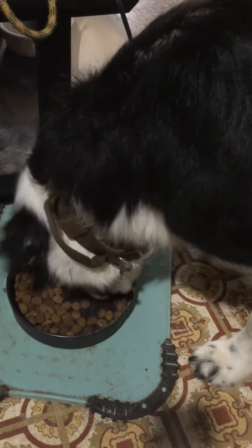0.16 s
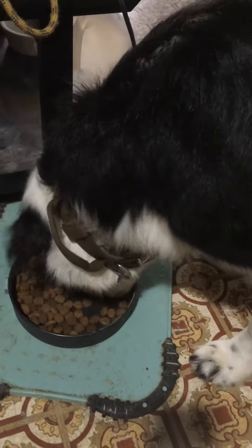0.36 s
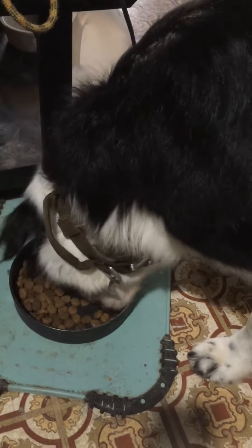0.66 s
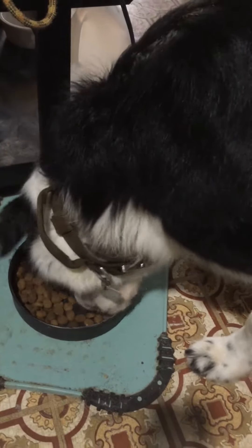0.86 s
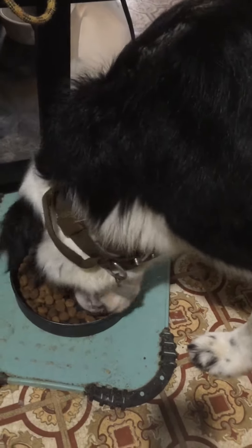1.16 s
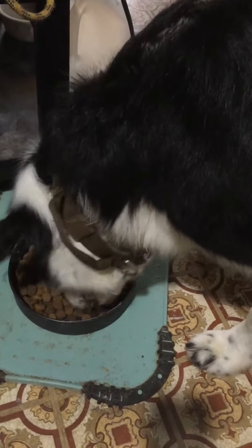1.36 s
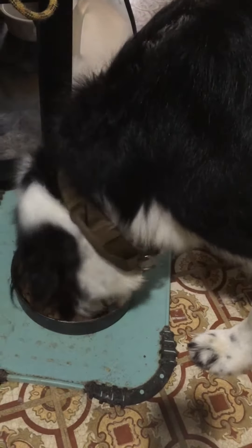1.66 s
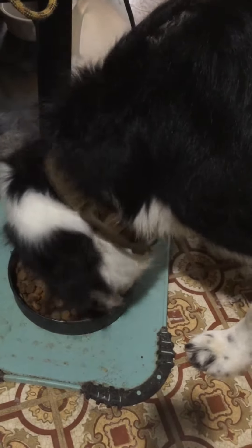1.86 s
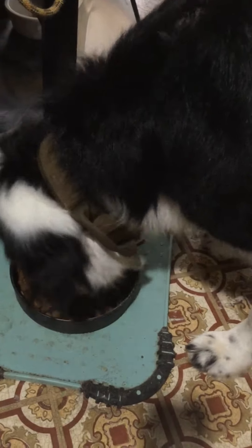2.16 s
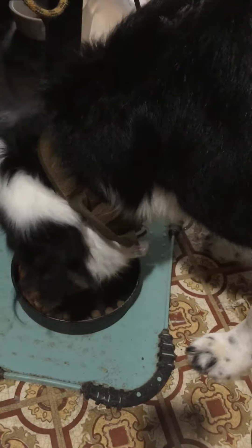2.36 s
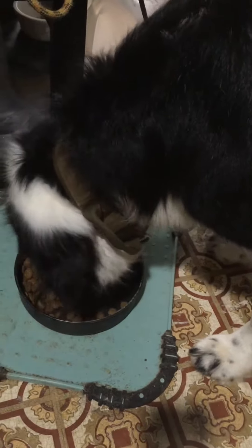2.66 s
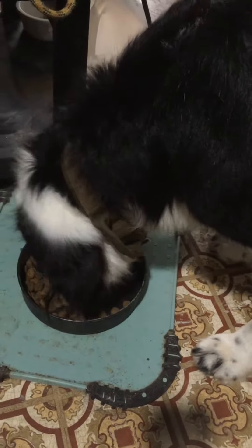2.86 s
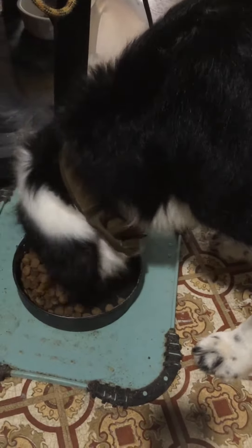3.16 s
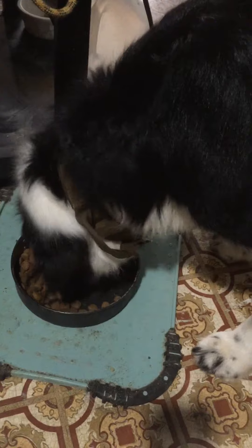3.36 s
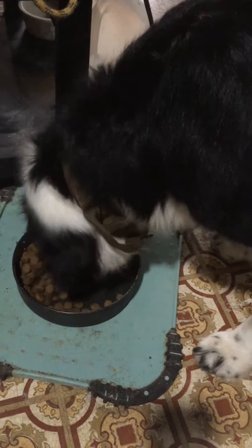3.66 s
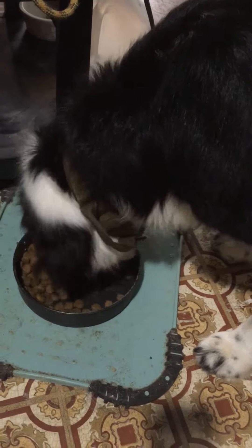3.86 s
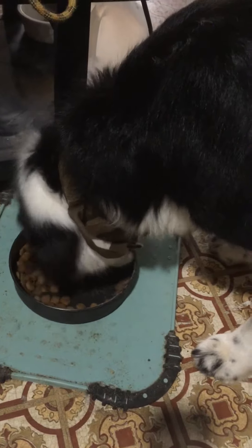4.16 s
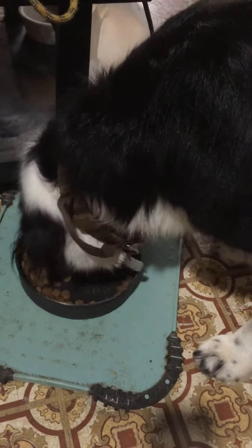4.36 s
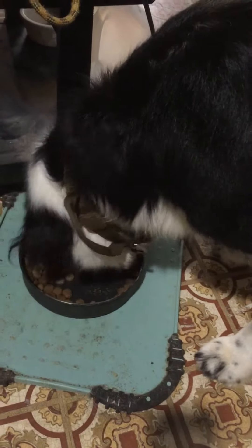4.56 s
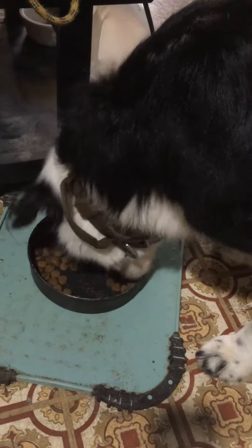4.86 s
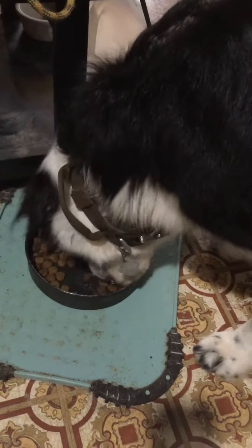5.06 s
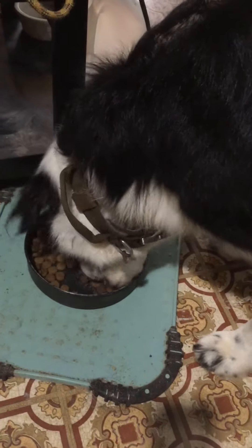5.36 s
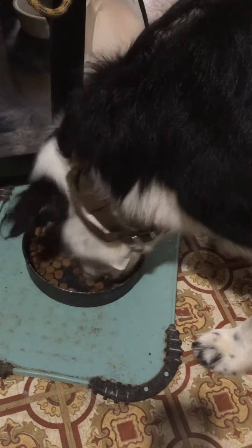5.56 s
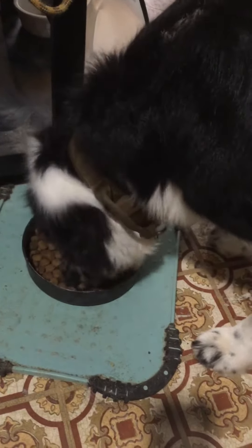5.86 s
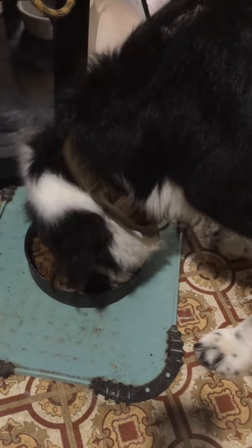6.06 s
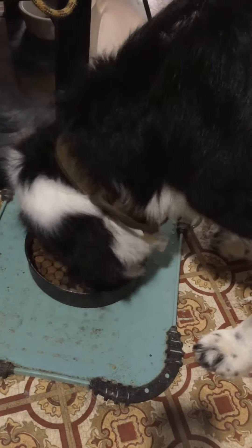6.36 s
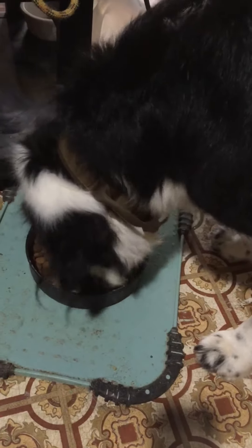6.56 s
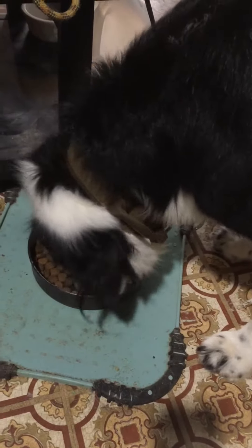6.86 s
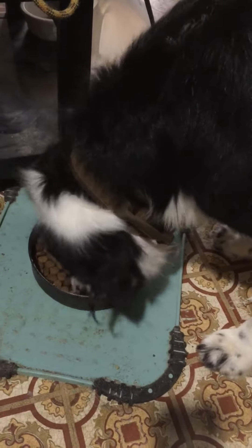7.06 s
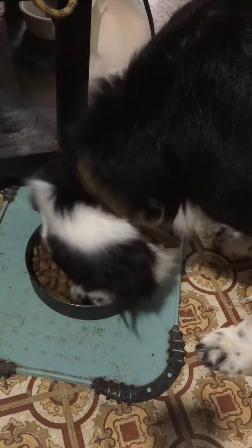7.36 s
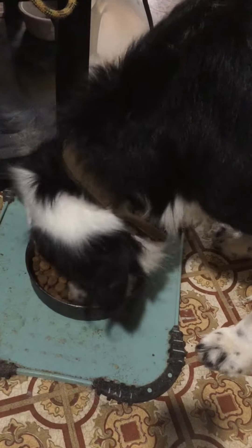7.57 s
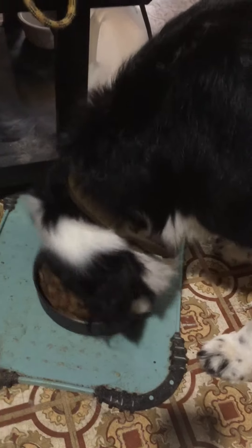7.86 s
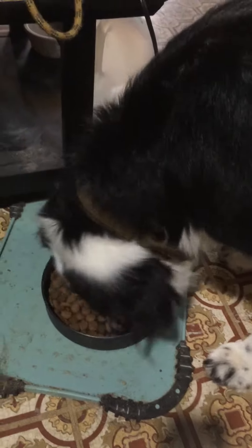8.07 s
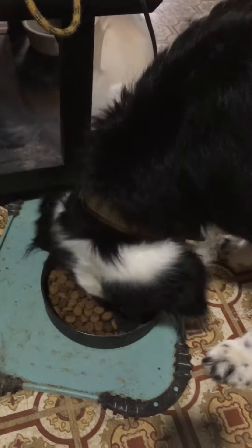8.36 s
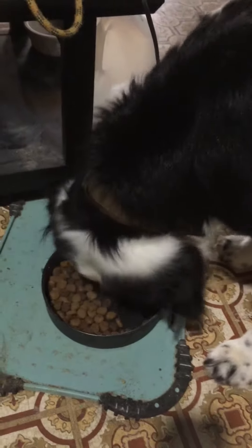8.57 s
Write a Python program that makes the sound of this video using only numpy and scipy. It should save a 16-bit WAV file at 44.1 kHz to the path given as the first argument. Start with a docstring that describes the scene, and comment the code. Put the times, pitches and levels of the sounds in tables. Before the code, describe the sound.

A dog crunches dry kibble from a bowl in a small tiled room, pellets rattling, with wet lip smacks and brief chewing pauses.

```python
"""A dog eats dry kibble from a bowl on a mat in a tiled room, over quiet air and a wavering hum (noise, sine).
Lips work, the muzzle nudges bowl and mat, and wet smacks start: clicks and bursts through mouth resonances.
Then pellets crack between the teeth as avalanches of tiny breaks, while the rest rattle, slide and scrape
as clumped clicks. Jaws clop softly; later a collar tag tinkles in decaying sines, crusts tick on the teeth,
the muzzle rubs the bowl with a hollow tone, and mouthfuls go down in smack-clop-smack gulps."""
import sys
import numpy as np
from scipy import signal
from scipy.fft import rfft, irfft
from scipy.io import wavfile
from scipy.ndimage import uniform_filter1d

SR = 44100
rng = np.random.default_rng(int(sys.argv[2]) if len(sys.argv) > 2 else 0)


def to_wav(sig):
    """Store sig (one row per channel, or 1-D mono) as 16-bit WAV at the path in sys.argv[1].

    Samples outside -1..1 are clipped; the rate is SR.
    """
    pcm = np.clip(np.atleast_2d(sig), -1, 1) * 32767
    pcm = np.round(pcm).astype(np.int16)
    wavfile.write(sys.argv[1], SR, pcm.T)  # frames by channels


N = 384552
GRAIN = 8192         # samples in one burst and in a colouring filter
CUTOFF_HZ = 16100    # top of the sound

# quiet indoor air, its tone: f/Hz, relative level/dB
AIR_SPECTRUM = [(25, -12.5), (45, -1.5), (65, -1), (110, -0.5), (300, -19), (1000, -20), (3000, -20.5),
                (8000, -27), (16000, -32)]
AIR_DB, HUM_HZ = -66.5, 59.7
# hum level curve: t/s, level/dB
HUM_LEVEL = [(0, -67), (7.5, -66.5), (8.1, -71.5)]
# lips and tongue working, level curve before make-up gain: t/s, level/dB
LIPS_LEVEL = [(0.0, -63.5), (0.27, -71), (2.96, -73), (3.54, -69.5), (8.43, -73.5), (8.72, -76.5)]
# tone of the working lips: f/Hz, relative level/dB
MOUTH_SPECTRUM = [(50, -15.5), (110, 7), (220, -1), (400, -6.5), (750, -8), (1200, -9), (3000, -20)]

# the muzzle digs into the food: peak t/s, rattle level/dB before the mix trim, swell time/s
DIGS = [(0.248, -41, 0.011), (0.424, -48.5, 0.022), (0.717, -38, 0.0074), (1.044, -42.5, 0.022),
        (1.405, -40, 0.072), (1.615, -37, 0.0027), (1.727, -36.5, 0.046), (3.028, -35.5, 0.0091),
        (3.13, -37.5, 0.11), (3.235, -50, 0.015), (3.406, -28.5, .02), (3.53, -38, 0.022),
        (3.69, -36.5, 0.029), (3.79, -41, 0.027), (3.97, -44.5, 0.009), (4.035, -39, 0.041),
        (4.19, -43, 0.21), (4.31, -33.5, 0.015), (4.357, -38, 0.0041), (4.479, -43.5, 0.034),
        (4.681, -34.5, 0.044), (4.81, -39, 0.012), (4.979, -36, 0.028), (5.051, -38, 0.021),
        (5.165, -40.5, 0.015), (5.315, -31.5, 0.033), (5.39, -37.5, 0.0087), (5.591, -41.5, 0.025),
        (5.669, -42, 0.053), (5.973, -37.5, 0.032), (6.297, -44.5, 0.015), (7.23, -42.5, 0.029),
        (7.358, -39, 0.033), (7.475, -33.5, 0.014), (8.412, -53.5, 0.097)]
# pellets nosed along the bowl: middle t/s, half length/s, hiss level/dB before the mix trim
SCRAPES = [(0.563, 0.011, -51), (0.612, 0.016, -45.5), (0.911, 0.0065, -36), (1.255, 0.0073, -38),
           (3.035, 0.0038, -31), (3.622, 0.017, -39), (4.352, 0.0084, -33), (4.691, 0.0094, -34),
           (4.82, 0.071, -44.5), (4.9, 0.022, -42), (5.861, 0.0093, -42.5), (7.937, 0.045, -49.5),
           (8.035, 0.022, -43.5), (8.408, 0.0079, -39)]
SETTLE_SHARE = 1.09          # pellets settle in this many swell times
HISS_UNDER_RATTLE_DB = -15   # hiss that a dig brings along
SCRAPE_RATTLE_DB = -2        # rattle that a scrape brings along, relative to its hiss
# tone of loose pellets, also of the wet click in a soft contact: f/Hz, relative level/dB
RATTLE_SPECTRUM = [(300, -40.5), (450, -5.5), (650, -6.5), (1100, -4.5), (2000, 0.5), (3500, -11.5),
                   (5000, -18), (8000, -19.5), (16000, -31.5)]
# tone of sliding crusts: f/Hz, relative level/dB
HISS_SPECTRUM = [(800, -12.5), (2000, 5), (4000, -2), (7000, -4.5), (10500, -10.5), (12500, -7),
                 (16000, -16.5)]

# crumbs break at random, each one stronger the harder the food is stirred
CRUMBS_PER_S, CRUMB_HZ, CRUMB_S = 18, 1790, 0.00036   # pitch is the middle of a spread
CRUMB_OVER_RATTLE_DB, CRUMB_IDLE_DB = -1.5, -57.5

# dull nudges against bowl and mat, before the contact trim: t/s, level/dB, f/Hz, swell time/s
NUDGES = [(0.091, -61, 226, 0.1), (0.568, -53.5, 93, 0.013), (1.258, -41, 66, 0.016),
          (5.649, -41, 203, 0.0081), (6.381, -52.5, 190, 0.027), (7.215, -39.5, 173, 0.006)]
NUDGE_WET_DB = -22
# small wet smacks of tongue and lips: t/s, level/dB, f/Hz, peeling time/s
SMACKS = [(0.103, -49, 2400, 0.00089), (0.12, -47, 650, 0.00099), (0.134, -45.5, 3850, 0.00093),
          (0.162, -53, 1050, .002), (2.131, -40, 654, 0.00081), (2.6, -38, 1470, 0.0012),
          (2.683, -38, 860, .002), (6.515, -44, 1500, .0014), (6.542, -47.5, 1110, 0.002),
          (6.708, -40, 2250, .0012), (6.744, -52, 4600, 0.0048), (6.794, -41, 2000, 0.0023),
          (6.807, -45, 3340, 0.0012), (6.85, -35, 2020, .0024), (6.894, -39, 1340, 0.011),
          (7.11, -41.5, 1530, 0.00089), (7.192, -39, 1940, 0.001), (7.319, -44, 1880, 0.0024),
          (7.36, -34.5, 1540, 0.0048), (7.44, -34, 1600, 0.0017), (7.711, -41.5, 1363, 0.0019),
          (7.778, -47.5, 1140, .005), (8.169, -42, 1400, 0.0096), (8.231, -42.5, 1540, .0015),
          (8.285, -42.5, 1800, 0.0031), (8.498, -42.5, 830, .0013), (8.632, -47, 1670, 0.0038)]

# loud breaks of a pellet: t/s, level/dB, f/Hz, nominal crumbling time/s, bright snap level/dB re the break
CRACKS = [(0.212, -42.5, 1880, 0.0011, -30), (0.25, -35.5, 1140, 0.0019, -25),
          (0.305, -25.0, 3060, 0.00096, -8.5), (0.396, -37.5, 1840, 0.00063, -25),
          (0.452, -46.5, 1260, 0.0028, -25), (0.74, -27, 1080, 0.0013, -18),
          (0.775, -8.0, 2100, 0.00072, -15.5), (0.831, -32, 1540, 0.0007, -30),
          (1.03, -33.5, 990, 0.002, -30), (1.069, -24.5, 1440, 0.00056, -38),
          (1.413, -24.5, 1550, 0.0013, -34), (1.432, -16.5, 1230, 0.0011, -18.5),
          (1.456, -35, 1220, 0.0015, -29), (1.545, -35, 1450, 0.0012, -29), (1.667, -34, 1470, 0.001, -39),
          (1.707, -25.5, 1980, 0.0022, -13), (1.737, -22, 1540, 0.00092, -25),
          (1.771, -26, 1440, 0.00065, -35), (1.822, -25, 1660, 0.00072, -26),
          (1.914, -16, 1480, 0.0006, -38), (1.932, -27.5, 1230, 0.00082, -32),
          (2.908, -24.5, 1464, 0.0013, -32), (2.916, -24.5, 1680, 0.00071, -17),
          (2.994, -32.5, 1680, 0.00084, -23), (3.003, -30.0, 1520, 0.00071, -21),
          (3.02, -23, 2000, 0.0025, -21.5), (3.054, -27, 1560, 0.00072, -16),
          (3.143, -30.5, 1840, 0.0081, -16), (3.191, -15.5, 2110, 0.0037, -8.5),
          (3.211, -20, 1860, 0.00097, -16), (3.317, -30.5, 1280, 0.0011, -23),
          (3.37, -24, 1840, 0.00083, -12), (3.394, -9, 2340, 0.00093, -17.5),
          (3.429, -20.5, 2000, 0.0011, -20), (3.506, -15.5, 1900, 0.0012, -23),
          (3.678, -24.5, 1840, 0.0055, -24.5), (3.691, -22.5, 1970, 0.0012, -9),
          (3.7, -20, 1950, 0.0012, -18), (3.733, -24, 1590, 0.0011, -27),
          (3.935, -31.5, 1520, 0.0018, -14.5), (4.008, -9.5, 2090, 0.0015, -17),
          (4.03, -24, 2000, 0.0033, -13.5), (4.139, -22.5, 1700, 0.0013, -12),
          (4.151, -21.5, 2580, 0.0016, -14), (4.224, -25.5, 1950, 0.001, -31),
          (4.365, -21, 2100, 0.0029, -13), (4.468, -16.5, 2470, 0.0026, -12),
          (4.702, -18.5, 1920, 0.0021, -32), (4.738, -19.5, 2900, 0.00034, -7),
          (4.768, -26.5, 2720, 0.001, -27), (4.787, -19, 2700, 0.0039, -8),
          (4.942, -29.5, 2170, 0.0021, -10), (4.977, -26, 2030, 0.0022, -26),
          (5.179, -20, 1650, 0.00076, -33), (5.301, -20, 1940, 0.0054, -16.5),
          (5.324, -17, 1230, 0.00062, -21), (5.348, -21.5, 1000, 0.0011, -20),
          (5.364, -20, 1480, 0.0014, -25), (5.444, -26.5, 1480, 0.0017, -29),
          (5.456, -19, 1810, 0.0045, -10.5), (5.463, -11.5, 1860, 0.0014, -12.5),
          (5.646, -13, 1550, 0.00098, -20), (5.953, -31, 1450, 0.0016, -27),
          (5.986, -12.5, 1660, 0.001, -18), (6.012, -15.5, 2140, 0.0013, -16),
          (6.055, -18, 1840, 0.0008, -20.5), (6.103, -24.5, 1480, 0.00076, -39),
          (6.301, -13.5, 1820, 0.0012, -16.5), (6.333, -15.0, 2280, 0.0015, -16),
          (7.202, -24.5, 1650, 0.00065, -26), (7.402, -27.5, 1630, 0.0006, -22),
          (7.473, -29, 1560, 0.0025, -13), (7.521, -28.5, 1120, 0.0012, -22),
          (7.635, -30.5, 1830, 0.00044, -26), (7.74, -37.5, 1370, 0.0018, -34),
          (7.851, -39, 1450, 0.0012, -25), (7.97, -25, 1550, 0.0012, -20), (8.018, -18, 2360, 0.00057, -18),
          (8.131, -31.5, 1500, 0.00036, -22), (8.206, -34.5, 1400, 0.0015, -12.5),
          (8.396, -30, 2020, 0.0059, -14), (8.436, -27, 1980, 0.0011, -9), (8.56, -32, 1440, 0.00046, -27)]
# resonances of muzzle and bowl, before each break's variation: f/Hz, width/Hz, level/dB
CAVITY = [(673, 190, 6.5), (1010, 250, -0.5), (1350, 150, 7), (2130, 330, -3), (3130, 96, -11.5),
          (3600, 760, -4), (4190, 130, -7)]
# tone of the bright snap: f/Hz, relative level/dB
SNAP_SPECTRUM = [(2500, -38), (5500, 4), (8000, -1), (10500, -8.5), (13000, -7), (16000, -19)]

# jaws clop shut while chewing, before the contact trim: t/s, level/dB, f/Hz
CLOPS = [(0.741, -32, 756), (1.031, -32, 730), (2.618, -31, 507), (3.691, -24, 690), (4.01, -22, 900),
         (4.67, -27.5, 467), (6.708, -43, 560), (8.231, -36.5, 640)]
CLOP_S, CLOP_WET_DB = 0.0023, -9.5

# the tag touches the collar ring: t/s, level/dB, factor on the ringing time (fur damps it)
TAG_TOUCHES = [(1.536, -35, 0.11), (2.072, -46, 1.15), (2.086, -28, 0.31), (2.103, -33, 0.56),
               (5.74, -45, 0.13), (6.119, -51, 0.18), (7.762, -46, 0.12)]
# modes of the tag: f/Hz, mean level/dB, t60/s before that factor
TAG_MODES = [(7770, -10, .4), (10705, -5, .2), (14802, -3, .26)]

# a hard crust clicks against a tooth: t/s, level/dB
TOOTH_TICKS = [(2.014, -46), (2.03, -38), (3.449, -31.5), (4.284, -31)]
# the muzzle rubs along the bowl: t/s, level/dB, f/Hz, swell time/s
RUBS = [(2.029, -52, 755, 0.045), (2.181, -46.5, 860, 0.03), (2.475, -52.5, 755, 0.022),
        (2.59, -42, 637, 0.012), (6.85, -41, 584, 0.029)]

# swallowing a mouthful, before the contact trim: lips part t/s, jaws close t/s, level/dB, f/Hz
GULPS = [(2.13, 2.182, -41, 252), (2.59, 2.663, -26, 350), (6.847, 6.89, -26, 534),
         (7.157, 7.209, -25.5, 417)]
GULP_CLOSE_S = 0.0035   # the jaws close more slowly on a mouthful
# wet smacks before and after the jaws close, levels relative to the gulp
SMACK_HZ, SMACK_DB, SMACK_S, SMACK_WET_DB = 684, -12.5, 0.0051, -2
AFTER_S, AFTER_HZ, AFTER_DB, AFTER_LENGTH_S = 0.011, 930, -11.5, 0.0049

# the room's tail: f/Hz, t60/s, level/dB
ROOM_TAIL = [(154.6, 0.13, 3), (716, 0.26, -6), (1850, 0.29, -6), (4950, 0.26, -9.5), (9670, 0.23, -8),
             (15900, 0.24, -25)]


def from_db(db):
    """Decibels to gain."""
    return 10 ** (np.asarray(db) / 20)


def unit(x):
    """Scale to energy 1."""
    return x / np.sqrt(np.sum(x ** 2) + 1e-20)


def rms_one(x):
    """Scale to rms 1."""
    return unit(x) * np.sqrt(len(x))


def level_curve(rows):
    """Draw straight lines through a level table, one value per sample."""
    t, level_db = np.transpose(rows)
    return np.interp(np.arange(N) / SR, t, level_db)


def at_hz(points, hz, column=1):
    """Read a table on a log-frequency axis."""
    points = np.array(points)
    return np.interp(np.log(hz + 1), np.log(points[:, 0]), points[:, column])


def add(out, s, sound):
    """Mix a sound in at a time."""
    i = max(0, round(s * SR))
    out[i:i + len(sound)] += sound[:N - i]


def colour(x, spectrum):
    """Give a sound a spectrum with a causal, minimum-phase filter, so attacks stay sharp."""
    gain = from_db(at_hz(spectrum, np.fft.rfftfreq(GRAIN, 1 / SR)))
    cepstrum = irfft(np.log(gain))
    # folding the cepstrum onto positive time makes the phase minimal
    cepstrum[1:GRAIN // 2] *= 2
    cepstrum[GRAIN // 2 + 1:] = 0
    impulse = irfft(np.exp(rfft(cepstrum)))
    return signal.fftconvolve(x, impulse)[:len(x)]


def band_pass(x, low, high):
    """Keep one band."""
    return signal.sosfilt(signal.butter(2, [low, high], "band", fs=SR, output="sos"), x)


def resonate(x, hz, width):
    """Ring one damped resonance with gain 1 on top."""
    r = np.exp(-np.pi * width / SR)
    feed = np.array([1, 0, -1]) * (1 - r * r) / 2
    feedback = [1, -2 * r * np.cos(2 * np.pi * hz / SR), r * r]
    return signal.lfilter(feed, feedback, x + 1e-18)


def ring_twice(x, hz, first_width, second_width):
    """Pass a sound through two resonances at one pitch."""
    return resonate(resonate(x, hz, first_width), hz, second_width)


def clicks(size, per_s, spread_db):
    """Random clicks of uneven strength and either sign."""
    strength = from_db(spread_db * np.minimum(rng.exponential(1, size), 4))
    sign = rng.choice([-1, 1], size)
    return strength * sign * (rng.random(size) < per_s / SR)


def clumps(depth_db, per_s):
    """A gain that wanders in random steps joined by straight lines; rms 1."""
    knots = np.clip(rng.standard_normal(N // 40), -2, 2)
    wander = np.interp(np.arange(N) / SR * per_s, np.arange(len(knots)), knots)
    return rms_one(from_db(depth_db * wander))


def fracture(crumble_s, spread_db=4.5):
    """A quick avalanche of tiny breaks, a few much stronger than the rest, that swells and dies away."""
    age = 1.5 * np.arange(GRAIN) / SR / max(crumble_s, 1 / 1500)
    return clicks(GRAIN, per_s=17000, spread_db=spread_db) * age * np.exp(-age)


def evened(burst):
    """Spread a burst's energy evenly over all pitches, keeping its attack and grain."""
    power = uniform_filter1d(np.abs(rfft(unit(burst))) ** 2, size=160)
    hz = np.fft.rfftfreq(GRAIN, 1 / SR) + 1
    inverse_db = -10 * np.log10(np.abs(power) + 1e-6)
    return unit(colour(burst, np.c_[hz, inverse_db]))


def soft_contact(s, db, hz, close_s, wet_db, width_share=1.0, flesh_db=-15, flesh_hz=175, trim_db=-1.0):
    """Soft flesh meets a surface: one push rings a hollow clop and a dull thud, with a wet click."""
    out, push = np.zeros(N), fracture(close_s)
    clop = unit(ring_twice(push, hz, width_share * hz, hz))
    thud = from_db(flesh_db) * unit(ring_twice(push, flesh_hz, flesh_hz / 2, flesh_hz))
    click = from_db(wet_db) * unit(colour(push, RATTLE_SPECTRUM))
    add(out, s, from_db(db + trim_db) * np.sqrt(close_s * SR) * (clop + thud + click))
    return out


def background(waver_db=5.5):
    """Coloured noise for quiet indoor air, and a low sine hum that wavers."""
    air = rms_one(colour(rng.standard_normal(N), AIR_SPECTRUM))
    tone = np.sqrt(2) * np.sin(2 * np.pi * HUM_HZ * np.arange(N) / SR)
    hum = tone * clumps(waver_db, per_s=17)
    return from_db(AIR_DB) * air + from_db(level_curve(HUM_LEVEL)) * hum


def lips(gain_db=6.5):
    """Small soft smacks: random clicks ring one broad mouth resonance."""
    soft = resonate(clicks(N, per_s=290, spread_db=7.5), 400, 940)
    return from_db(level_curve(LIPS_LEVEL) + gain_db) * rms_one(colour(soft, MOUTH_SPECTRUM))


def stirring(idle_db=-76, swell_shape=1.54):
    """Rattle and hiss gains: digs swell and settle, scrapes pass, and either brings some of the other."""
    t = np.arange(N) / SR
    dig_power, scrape_power = np.zeros(N), np.zeros(N)
    for s, db, swell_s in DIGS:
        near = np.abs(t - s) < 6 * swell_s
        age = (t[near] - s) / swell_s
        distance = np.maximum(-age, age / SETTLE_SHARE)   # rise and fall have their own pace
        dig_power[near] += from_db(db) ** 2 * np.exp(-distance ** swell_shape)
    for s, half_s, db in SCRAPES:
        near = np.abs(t - s) < 3 * half_s
        scrape_power[near] += from_db(db) ** 2 * np.exp(-((t[near] - s) / half_s) ** 2)
    rattle_power = dig_power + scrape_power * from_db(SCRAPE_RATTLE_DB) ** 2 + from_db(idle_db) ** 2
    hiss_power = scrape_power + dig_power * from_db(HISS_UNDER_RATTLE_DB) ** 2
    return np.sqrt(rattle_power), np.sqrt(hiss_power)


def rattle(width_share=0.15, rub_db=-21):
    """Loose pellets of many sizes tick against each other in little flurries, over a soft rubbing."""
    flurry = clumps(depth_db=6.5, per_s=170)
    ticks = np.zeros(N)
    for hz in np.geomspace(600, 6000, num=18):   # one pitch per pellet size
        hits = flurry * clicks(N, per_s=55, spread_db=3.0)
        ticks += ring_twice(hits, hz, width_share * hz, hz)
    rub = from_db(rub_db) * flurry * rng.standard_normal(N)
    return rms_one(colour(rms_one(ticks) + rub, RATTLE_SPECTRUM))


def sliding(flicker_db=2.0):
    """Rough crusts scrape past each other; coarse and fine grit catch at different moments."""
    edges = np.geomspace(1000, 17000, num=9)
    grit = np.zeros(N)
    for low, high in zip(edges, edges[1:]):
        catches = band_pass(clicks(N, per_s=4500, spread_db=3.5), low, high)
        grit += catches * clumps(flicker_db, per_s=140)
    return rms_one(colour(grit * clumps(depth_db=2.5, per_s=140), HISS_SPECTRUM))


def digging(rattle_gain, hiss_gain, rattle_trim_db=-0.5, hiss_trim_db=3.5):
    """Loose pellets rattle and slide with a fine, dry hiss, each riding its stirring gain."""
    pellets = from_db(rattle_trim_db) * rattle_gain * rattle()
    return pellets + from_db(hiss_trim_db) * hiss_gain * sliding()


def crumbs(rattle_gain, spread_db=0.5, pitch_spread=0.57, snap_db=-18):
    """Small breaks at uneven moments, as rows like those of the loud ones, led by the stirring."""
    slots = np.arange(0, N / SR, 1 / CRUMBS_PER_S)[:-1]
    delay, size, pitch = rng.uniform(-1.4, 1, (len(slots), 3)).T
    times = slots + np.abs(delay) / CRUMBS_PER_S
    stirred = np.interp(times * SR, np.arange(N), rattle_gain)
    gain = stirred * from_db(CRUMB_OVER_RATTLE_DB) + from_db(CRUMB_IDLE_DB)
    level_db = 20 * np.log10(gain) + spread_db * size
    hz = CRUMB_HZ * np.exp(pitch_spread * pitch)
    return [(s, db, f, CRUMB_S, snap_db) for s, db, f in zip(times, level_db, hz)]


def nudges():
    """The muzzle nudges bowl and mat in slow, dull soft contacts."""
    return sum(soft_contact(s, db, hz, swell_s, NUDGE_WET_DB) for s, db, hz, swell_s in NUDGES)


def smacks(width_share=0.14, upper_ratio=1.38, upper_db=-5, gape_spread=0.21):
    """A film of saliva peels apart and rings two resonances of the mouth, spaced differently each time."""
    out = np.zeros(N)
    for s, db, hz, peel_s in SMACKS:
        film = evened(fracture(peel_s))
        upper_hz = hz * upper_ratio * np.exp(gape_spread * rng.standard_normal())
        lower = unit(ring_twice(film, hz, width_share * hz, hz / 2))
        upper = unit(ring_twice(film, upper_hz, width_share * upper_hz, upper_hz / 2))
        add(out, s, from_db(db) * np.sqrt(peel_s * SR) * (lower + from_db(upper_db) * upper))
    return out


def in_cavity(pellet, gape_shift=0.046, mode_spread_db=3.5):
    """Add the resonances of muzzle and bowl, whose shape changes with every bite."""
    body = pellet.copy()
    for hz, width, mode_db in CAVITY:
        shift, strength = rng.standard_normal(2)
        mode = resonate(pellet, hz * np.exp(gape_shift * shift), width)
        body += mode * from_db(mode_db + mode_spread_db * strength)
    return body


def cracks(breaks, split_s=0.00018, width_share=0.89, splinter_s=0.0015, lowest_hz=480, highest_hz=6500):
    """Each break is an avalanche that rings at the pellet's pitch, then in the muzzle and bowl."""
    out = np.zeros(N)
    for s, db, hz, crumble_s, snap_db in breaks:
        burst = unit(fracture(crumble_s, spread_db=3.0))
        # the pellet splits in two with a click; the quicker the break, the more it stands out
        add(burst, crumble_s / 2, np.sqrt([split_s / crumble_s]))
        pellet = ring_twice(evened(burst), hz, width_share * hz, 2 * hz)
        body = unit(band_pass(in_cavity(pellet), lowest_hz, highest_hz))
        # fine splinters keep breaking a little longer and give the bright snap
        splinters = unit(colour(fracture(crumble_s + splinter_s), SNAP_SPECTRUM))
        snap = from_db(snap_db) * splinters
        add(out, s, from_db(db) * np.sqrt(np.e / 2 * crumble_s * SR) * (body + snap))
    return out


def clops():
    """The jaws clop shut while chewing, as quick soft contacts."""
    return sum(soft_contact(s, db, hz, CLOP_S, CLOP_WET_DB, width_share=0.87, flesh_db=-23.0)
               for s, db, hz in CLOPS)


def tag(tick_db=-11):
    """Each touch gives a thin tick and sets the small metal plate ringing in decaying sines."""
    out, t = np.zeros(N), np.arange(SR // 2) / SR
    for s, db, share in TAG_TOUCHES:
        for hz, mode_db, t60 in TAG_MODES:
            start_db = db + mode_db + 2.5 * rng.standard_normal()
            ring = from_db(start_db - 60 * t / (t60 * share)) * np.sin(2 * np.pi * hz * t)
            add(out, s, ring)
        tick = unit(band_pass(fracture(0.002), 8000, 13000))
        add(out, s, from_db(db + tick_db) * 10 * tick)
    return out


def tooth_ticks(contact_s=0.00072, low_hz=5500):
    """Thin, bright clicks at the front teeth, too far forward to ring the muzzle."""
    out = np.zeros(N)
    for s, db in TOOTH_TICKS:
        tick = unit(band_pass(fracture(contact_s), low_hz, CUTOFF_HZ))
        add(out, s, from_db(db) * np.sqrt(contact_s * SR) * tick)
    return out


def rubs(width_share=0.11):
    """Many tiny slips feed one narrow resonance of the space between muzzle and bowl."""
    out = np.zeros(N)
    for s, db, hz, swell_s in RUBS:
        tone = unit(ring_twice(fracture(swell_s), hz, width_share * hz, hz / 2))
        add(out, s, from_db(db) * np.sqrt(swell_s * SR) * tone)
    return out


def gulps():
    """Every gulp runs the same way: the lips part with a smack, the jaws clop shut, the tongue smacks."""
    out = np.zeros(N)
    for part_s, shut_s, db, hz in GULPS:
        out += soft_contact(part_s, db + SMACK_DB, SMACK_HZ, SMACK_S, SMACK_WET_DB)
        out += soft_contact(shut_s, db, hz, GULP_CLOSE_S, CLOP_WET_DB)
        out += soft_contact(shut_s + AFTER_S, db + AFTER_DB, AFTER_HZ, AFTER_LENGTH_S, SMACK_WET_DB)
    return out


def room(x, echo_s=0.001748, echo_db=-11.0, bounce_s=0.0036, bounce_db=-10):
    """A clean echo off the tiles, a scattered one off nearby things, then a tail dying band by band."""
    t = np.arange(SR // 2) / SR
    response = np.r_[1, np.zeros(N - 1)]   # the direct sound
    add(response, echo_s, from_db([echo_db]))
    add(response, bounce_s, from_db(bounce_db) * evened(fracture(0.00067)))
    edges = np.r_[110, 230, np.geomspace(400, 17000, num=14)]
    for low, high in zip(edges, edges[1:]):
        hz = np.sqrt(low * high)
        decay = from_db(-60 * t / at_hz(ROOM_TAIL, hz))
        tail = unit(band_pass(rng.standard_normal(len(t)) * decay, low, high))
        band_share = np.sqrt(2 * (high - low) / SR)
        add(response, bounce_s, from_db(at_hz(ROOM_TAIL, hz, column=2)) * band_share * tail)
    return signal.fftconvolve(x, response[:len(t)])[:N]


def scene():
    """The meal in its room; rubs, tag and background stay outside the room's echoes."""
    rattle_gain, hiss_gain = stirring()
    food = digging(rattle_gain, hiss_gain) + cracks(crumbs(rattle_gain)) + cracks(CRACKS)
    muzzle = lips() + nudges() + smacks() + clops() + tooth_ticks() + gulps()
    return (room(food + muzzle) + rubs() + tag() + background())[None]


def record(dry, low_cut_hz=45):
    """The microphone sheds the deep bass, and the top is cut steeply."""
    thinned = signal.sosfilt(signal.butter(3, low_cut_hz, "high", fs=SR, output="sos"), dry)
    return signal.sosfilt(signal.ellip(10, .3, 70, CUTOFF_HZ, fs=SR, output="sos"), thinned)


dry = scene()
out = record(dry)
to_wav(out)
```